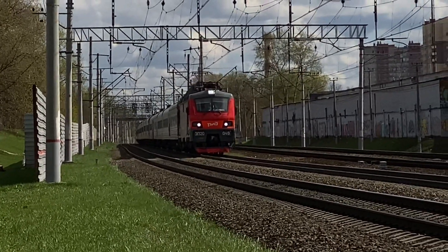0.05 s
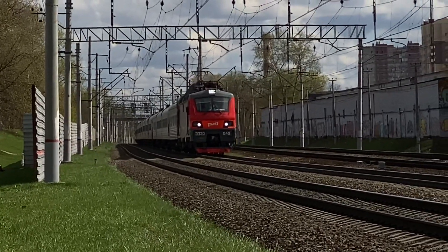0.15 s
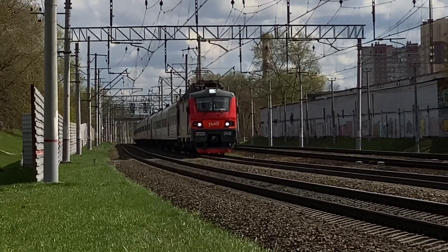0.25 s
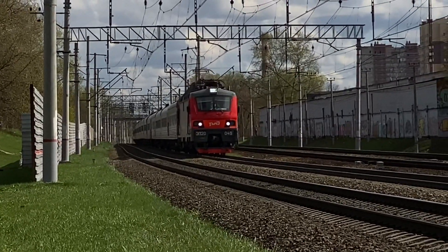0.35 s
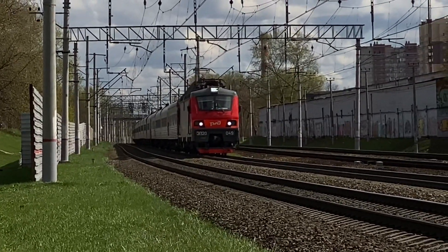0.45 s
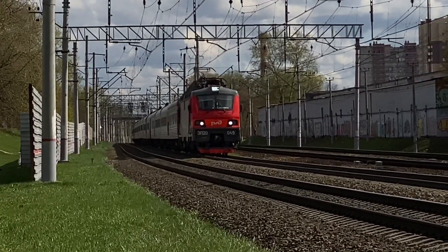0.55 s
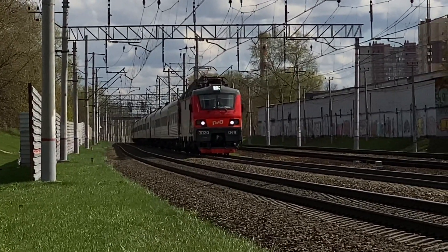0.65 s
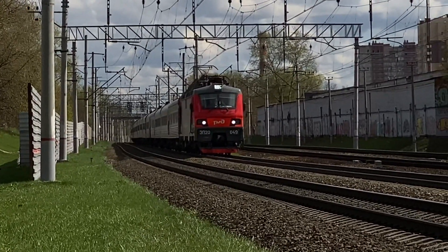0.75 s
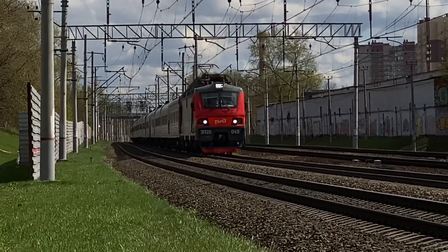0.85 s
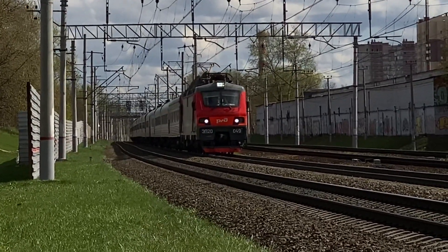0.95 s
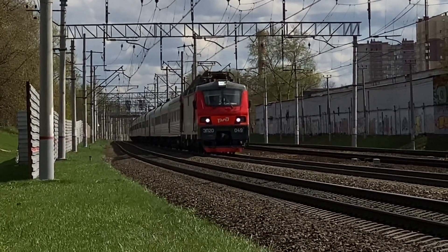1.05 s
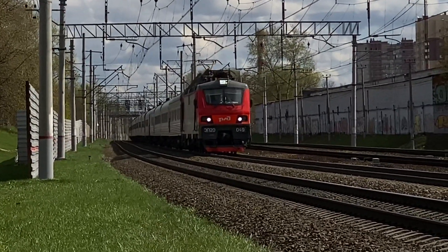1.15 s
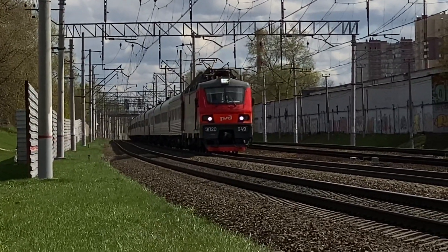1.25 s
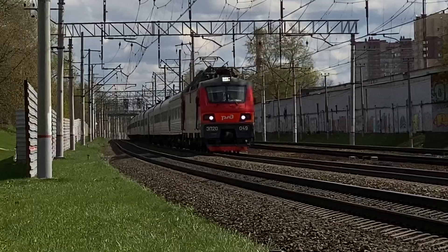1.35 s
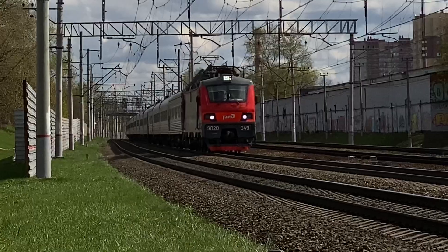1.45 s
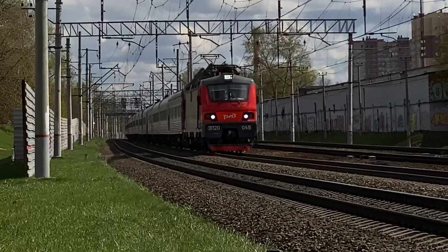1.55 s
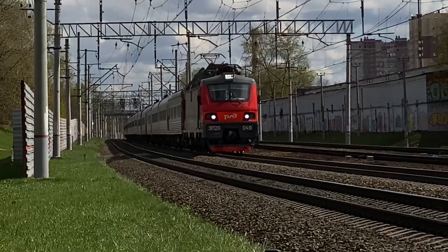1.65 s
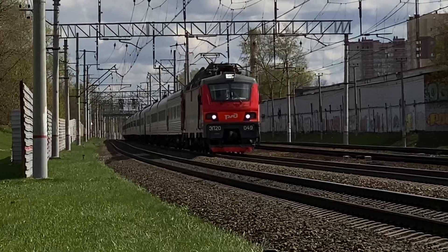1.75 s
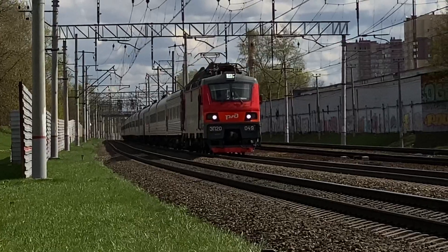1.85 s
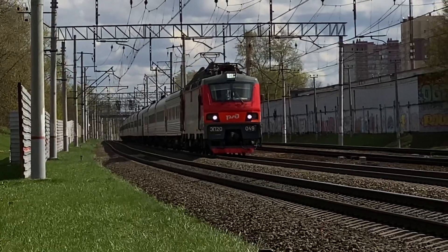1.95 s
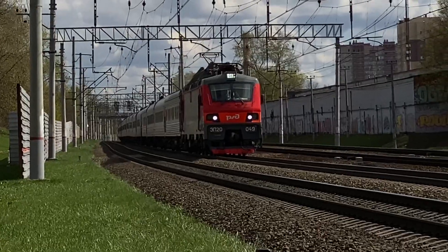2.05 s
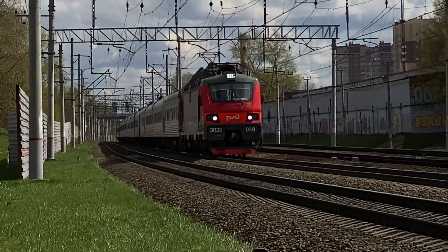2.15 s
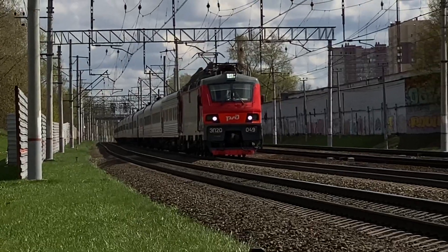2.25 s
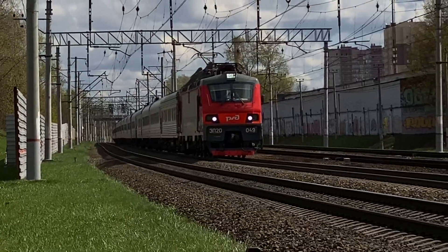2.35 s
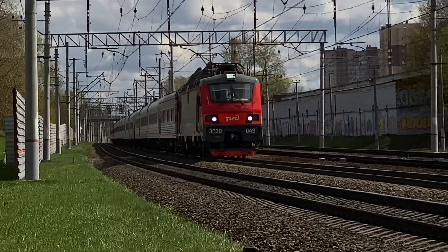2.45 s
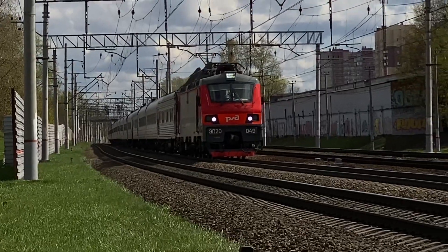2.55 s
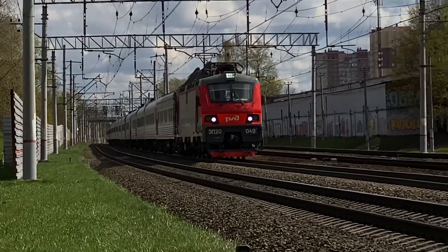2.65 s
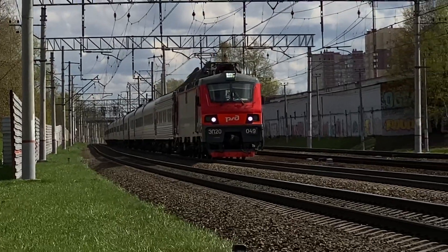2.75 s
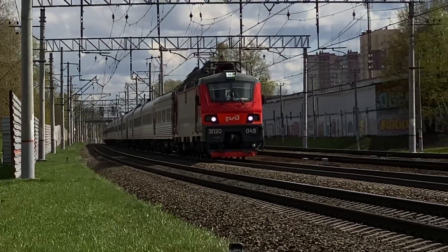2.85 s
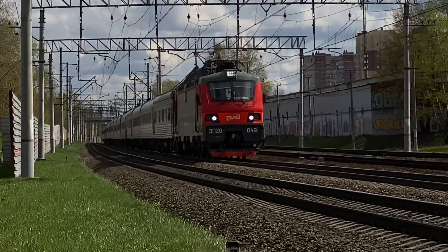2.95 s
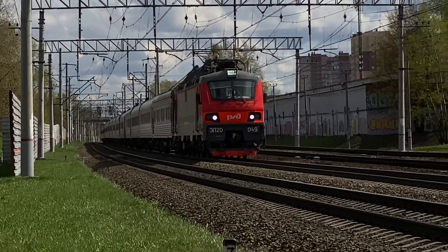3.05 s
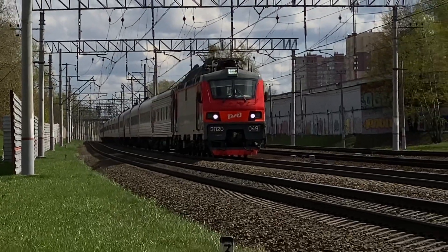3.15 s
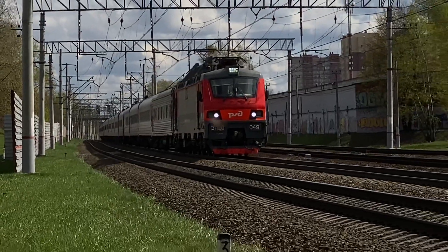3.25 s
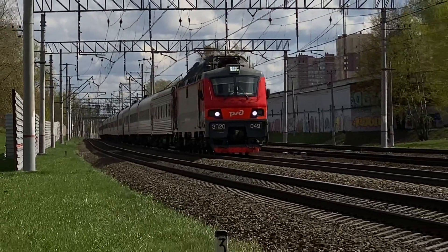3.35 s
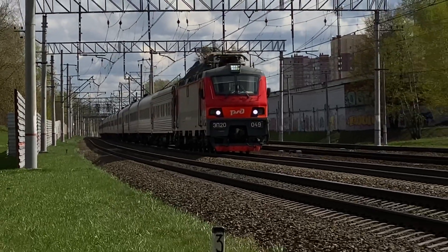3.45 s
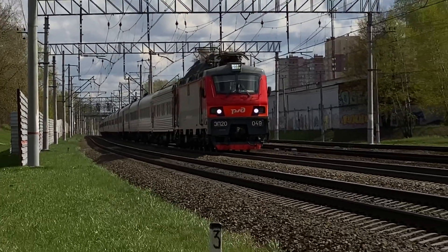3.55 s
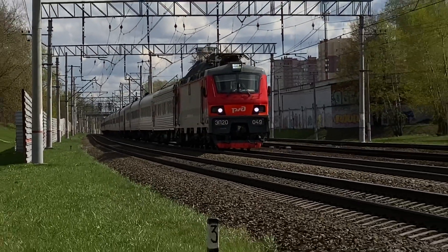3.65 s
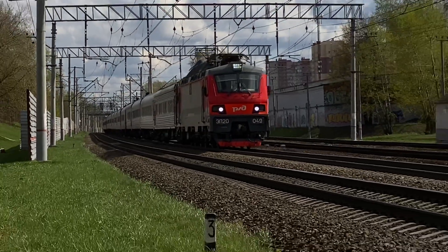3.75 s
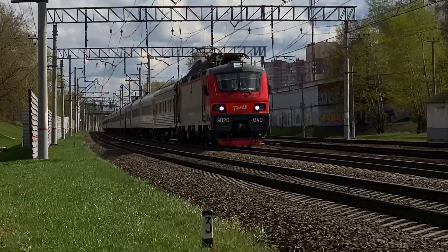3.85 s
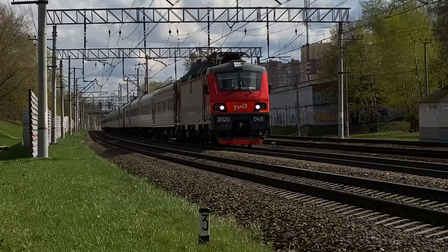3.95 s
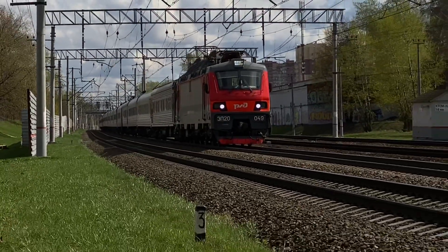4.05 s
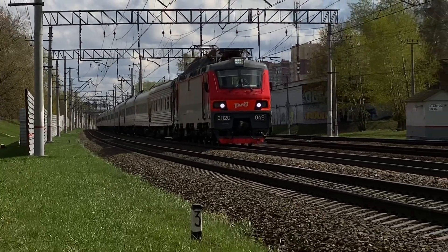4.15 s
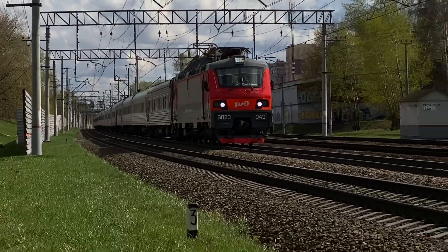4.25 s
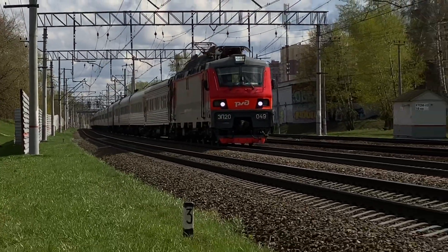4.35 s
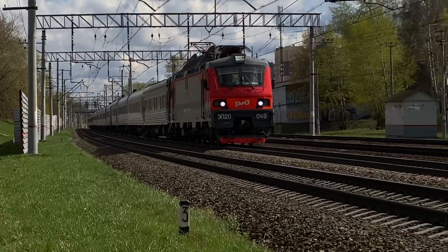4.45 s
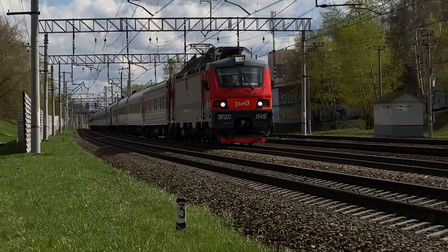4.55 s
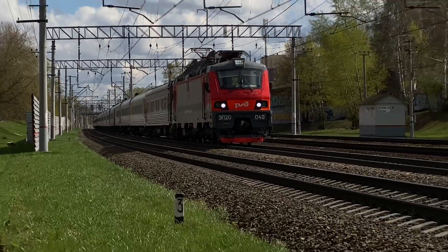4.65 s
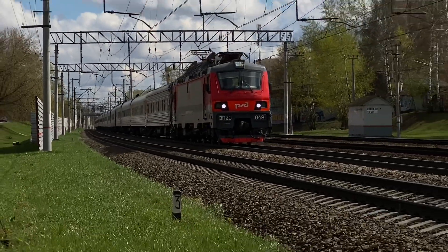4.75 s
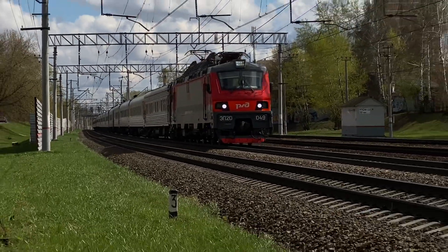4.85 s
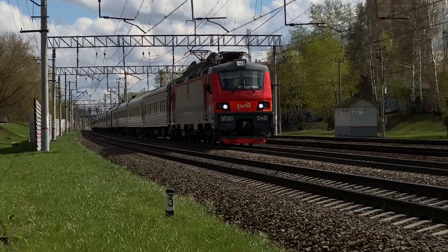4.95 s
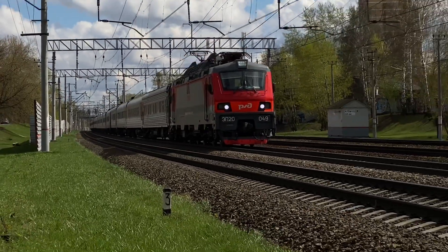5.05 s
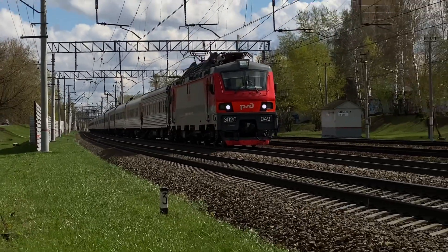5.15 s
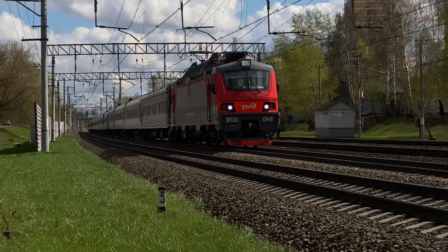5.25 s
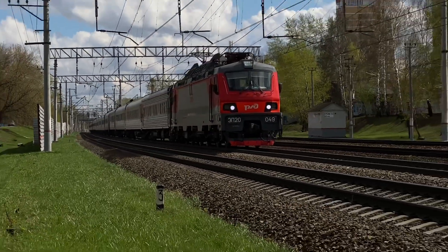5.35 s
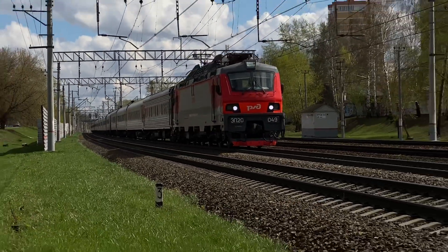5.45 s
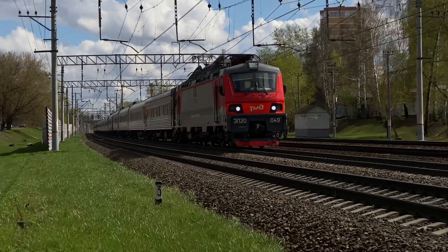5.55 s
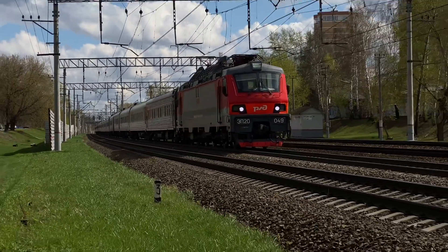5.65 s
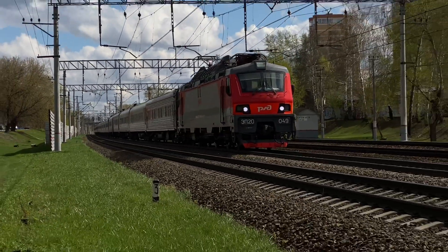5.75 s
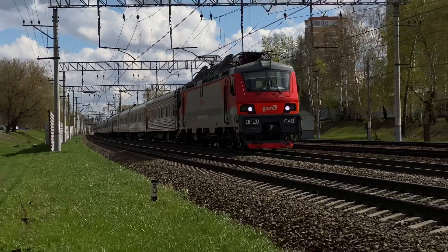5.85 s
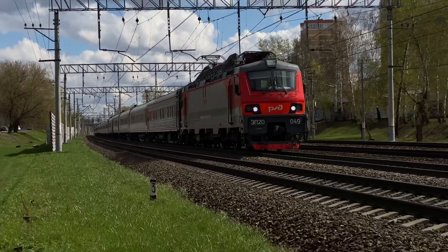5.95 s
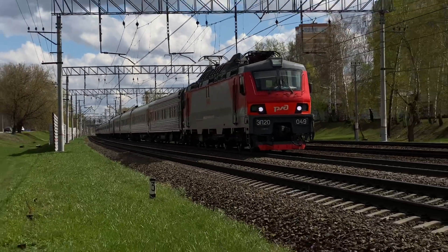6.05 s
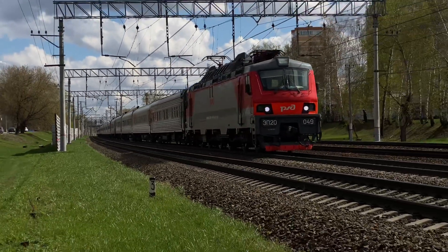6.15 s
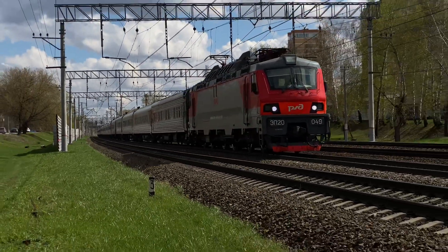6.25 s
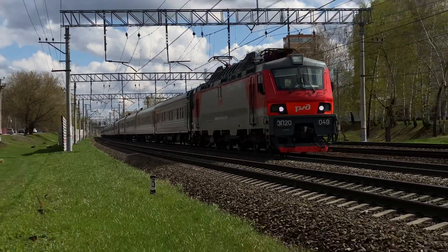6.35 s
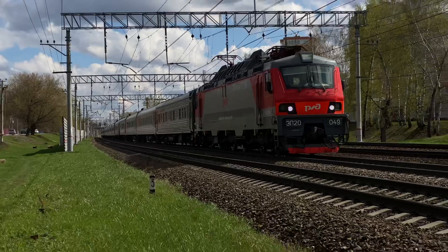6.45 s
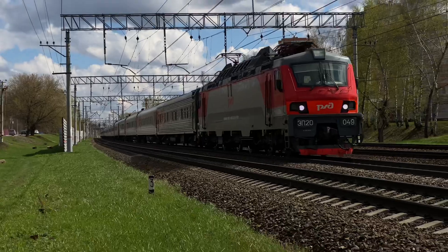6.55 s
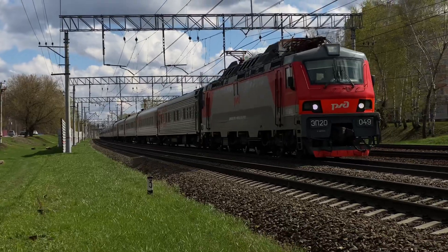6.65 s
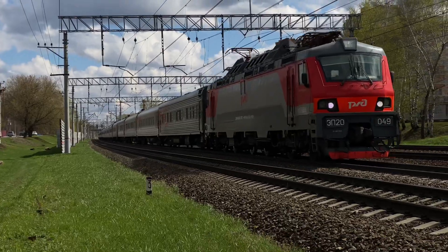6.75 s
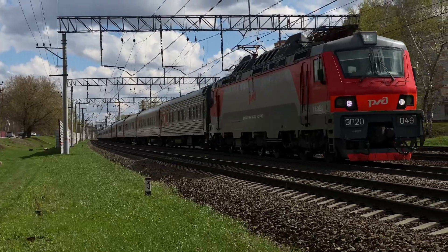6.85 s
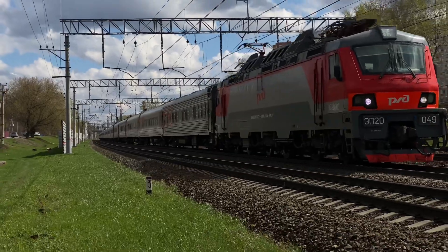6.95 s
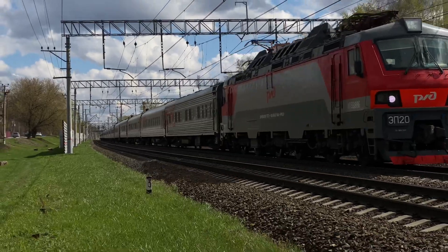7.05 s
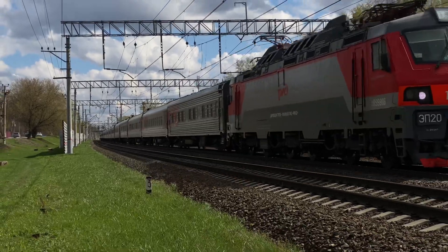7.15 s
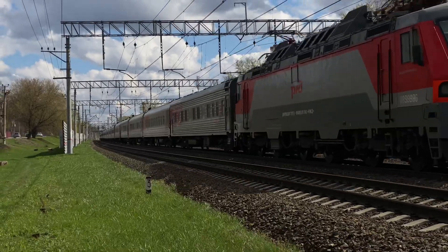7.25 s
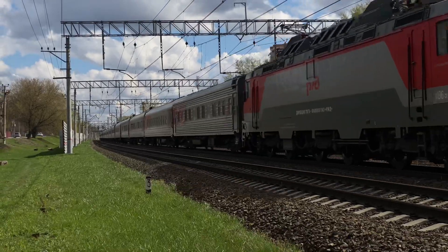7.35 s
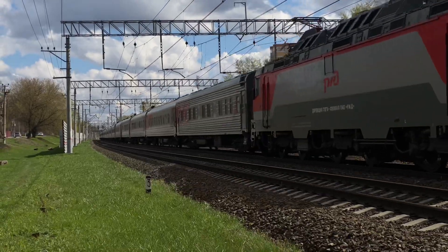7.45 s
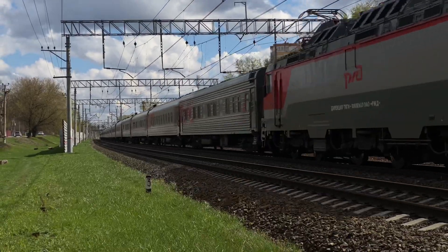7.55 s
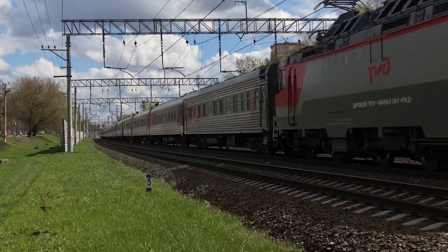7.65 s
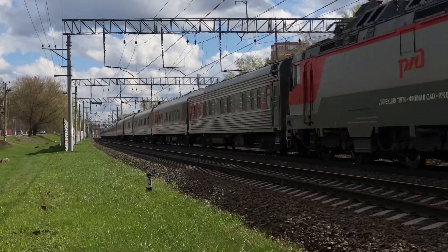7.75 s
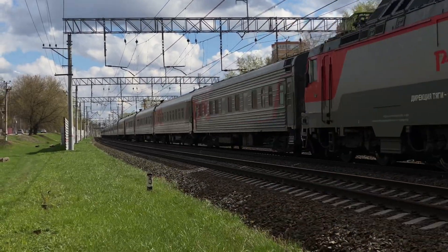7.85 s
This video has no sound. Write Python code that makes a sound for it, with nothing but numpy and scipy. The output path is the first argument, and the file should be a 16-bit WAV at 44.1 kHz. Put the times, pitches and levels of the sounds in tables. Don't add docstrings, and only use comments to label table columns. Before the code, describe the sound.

Deep rolling rumble grows slowly from near silence; a brief bright train whistle with hissing air sounds late as whining locomotive gears draw close.

```python
import sys
import numpy as np
from scipy import signal
from scipy.io import wavfile
from scipy.ndimage import uniform_filter1d

SR = 44100
rng = np.random.default_rng(int(sys.argv[2]) if len(sys.argv) > 2 else 0)


def inscribe(sig):
    pcm = np.round(np.clip(np.atleast_2d(sig).T, -1, 1) * 32767)
    wavfile.write(sys.argv[1], SR, pcm.astype(np.int16))


def magnitude_from_level(level_db):
    exponent = np.asarray(level_db, float) / 20
    return 10 ** exponent


N = 348875
WIN = 2048
HOP = WIN // 4

# time in seconds, closeness (0 far, 1 halfway, 2 near).
CLOSENESS = [(0, 0.31), (4.2, 0.079), (5.4, 1.006), (6.4, 1.207), (7.0, 1.718), (7.91, 2.08)]
STAGES = (0, 1, 1.25, 1.8, 2.16)

# time in seconds, level in dB.
RUMBLE = [(0.0, -65), (0.08, -56.5), (0.62, -48.5), (0.85, -55), (1.05, -44.5), (1.45, -42.5),
          (2.45, -40.5), (2.85, -36.5), (3.25, -38), (4.05, -34), (5.25, -31), (6.25, -28.5), (7.0, -27.5),
          (7.15, -24), (7.5, -24.5), (7.91, -25.5)]
RUMBLE_REF_DB = -40
# lowest Hz, highest Hz.
ZONES = [(80, 300), (500, 860), (1000, 1700), (4000, 8000)]
# share of the rumble's swell, town background in dB, dB at each stage.
ZONE_LEVELS = [(0.56, -70.5, -54, -55.5, -50, -46, -34), (0.26, -69, -63.5, -55, -52.5, -51.5, -39.5),
               (0.93, -99, -99, -91.5, -83.5, -76.5, -69.5)]
# Hz, then dB per Hz when far, halfway and near.
ROAR_COLOUR = [(29.8, -65.5, -59.5, -56), (85, -59, -52.5, -44.5), (320, -68.5, -64.5, -57.5),
               (494, -76, -68.5, -60), (874, -71.5, -72, -55.5), (1030, -83.5, -76.5, -64),
               (1215, -90, -75.5, -73.5), (1465, -93.5, -86.5, -72.5), (2300, -102, -96.5, -80),
               (3480, -115, -105, -91), (4520, -128, -112, -97), (7660, -142, -125, -103),
               (8260, -150, -136, -109), (16000, -160, -150, -130)]
# Hz, then dB when far, halfway and near.
ROAR_WIDTH = [(70, -19, -24, -17), (250, -18.5, -15.5, -24), (520, -9, 0, -4), (1020, -3.5, 8, -11),
              (1400, 1, -2.5, -1), (2100, -14.5, -8, -22), (3600, -22, -18.5, -26),
              (7500, -6.5, -8.5, -20.5), (8500, 0.5, -3.5, 1.5), (11500, -11.5, -13.5, -4)]

# time in seconds, level in dB.
DRUM_LEVEL = [(0, -83.5), (.15, -61), (1.2, -44.5), (1.85, -43), (2.6, -42), (3.4, -43.5), (4.12, -36.5),
              (4.5, -41.5), (5.07, -31.5), (5.18, -44), (5.44, -29), (5.62, -33.5), (5.75, -25), (6.3, -26),
              (6.37, -20), (6.65, -31.5), (7.2, -30), (7.91, -42)]
# time in seconds, pitch in Hz, unsteadiness from 0 to 1.
DRUM_NOTE = [(0, 65.77, 0.7), (3.8, 62.9, 0.5), (4.3, 62, 0.02), (5.5, 61, 0.1), (6.5, 58.7, 0.03),
             (7.0, 58.1, 0.4), (7.91, 57.25, 1)]

# time in seconds, first partial in Hz, second partial in Hz.
GEAR_HZ = [(0, 450, 903.7), (2.5, 452, 919), (4.5, 455, 921), (5.6, 461, 934.3), (6.4, 467, 938.4),
           (7.91, 464.9, 935)]
# time in seconds, level in dB.
GEAR_FIRST = [(0, -77), (.6, -68), (1.35, -55), (2.3, -53), (4.0, -51.5), (5.5, -51), (6.2, -49.5),
              (6.9, -44.5), (7.116, -33), (7.22, -50), (7.364, -30.5), (7.434, -38.5), (7.492, -28),
              (7.606, -25.5), (7.79, -39.5), (7.856, -25.5), (7.91, -22)]
# share of the rumble's swell, dB at each stage.
GEAR_UPPER = [(0.35, -57.5, -57.5, -51.5, -50.5, -38.5), (0.072, -78, -74, -64, -57.5, -46.5)]
# multiple of the first, dB over the fourth.
GEAR_OVERTONES = [(3, -8.5), (5, -1.5), (3.22, -8.5)]
# time in seconds, length in seconds, gain in dB.
FLARES = [(.15, 0.037, 9.5), (0.708, .07, 12), (1.17, .05, 9), (1.313, .04, 7), (1.76, .05, 7),
          (2.06, 0.057, 8.5), (2.33, .06, 5), (2.933, 0.095, 7), (3.34, .04, 5), (4.816, 0.044, 4.5),
          (5.71, 0.067, 4), (5.986, 0.044, 7), (6.45, .06, 6.5), (7.08, 0.073, 12), (7.588, .05, 8.5),
          (7.77, 0.11, 7)]
# Hz, width in Hz, level in dB.
BODY_RINGS = [(221, 24, -36.5), (598.5, 28, -42), (866, 40, -42.5)]
# Hz, width in Hz, level in dB, time in seconds, length in seconds.
RAIL_RINGS = [(334.9, 22, -50, 4.43, 1.22), (212, 40, -44, 5.6, 1.6)]

# time in seconds, pitch in Hz, first partial in dB, air hiss in dB.
BLAST = [(6.479, 741, -41, -46), (6.498, 753, -18.5, -37), (6.522, 723, -16, -38.5),
         (6.59, 701.3, -19.5, -37.5), (6.7, 705, -18, -37), (6.795, 699, -20, -40),
         (6.812, 680, -28, -42.5), (6.84, 670.4, -35, -46.5), (6.94, 650, -49.5, -64.5)]
# dB over the hiss, growth in dB per second while held, change in dB once spent.
PIPE_PARTIALS = [(-0.5, 1, -18), (6.5, 5, -3), (-2.5, 21, -4), (-6.5, -11, 8.5)]
# multiple of the first, dB over the hiss.
PIPE_HIGH = [(6, -5.5), (7, -9.5), (8, -15), (9, -16), (10, -20)]
CHIFF_DB, CHIFF_S = 8, 0.0097
HELD_FROM_S, SPEAKS_TILL_S = 6.55, 6.835
SILENT_S, FADE_S = 6.93, 0.035
# Hz, dB per Hz.
AIR_COLOUR = [(500, -76), (1000, -75.5), (1750, -76), (3150, -77), (4600, -72.5), (6000, -77), (8000, -76),
              (9500, -84.5), (11500, -82), (16000, -93)]
# Hz, side over mid in dB.
AIR_WIDTH = [(500, -6), (1000, 1), (1750, -34), (2500, -24), (3200, -11), (4600, -15), (8000, -5),
             (9500, -4), (11500, -8), (16000, 9)]
DULL_DB, DULL_S, DULL_HZ = -30, 0.067, (11000, 14500)
# delay in seconds, level in dB, left minus right in dB.
ECHOES = [(.075, -20, 2)]
TAIL_DB, TAIL_SIDE_DB, TAIL_T60_S = -16.5, -13.5, 1.7

# start in seconds, start Hz, end Hz, glide in seconds, decay in seconds, level in dB.
JOINT = (6.5455, 265, 66, .008, .022, -11)

# start in seconds, length in seconds,
# Hz, width in Hz, level in dB.
BURSTS = [(0., .045, 6900, 2400, -75), (0., .045, 4350, 600, -81), (0., .045, 3500, 600, -82),
          (1.519, .008, 9500, 5000, -88), (1.64, .09, 7200, 4500, -88)]
# Hz, dB per Hz.
CIRCUIT_HISS = [(3000, -140), (4500, -134), (7900, -134), (8200, -138), (11700, -139), (11900, -132),
                (12300, -132), (12500, -146), (16000, -146)]
# Hz, in step, a quarter turn ahead.
PORTS = [(25, -.03, 0.23), (250, 0.033, 0.095), (520, 0.058, 0.13), (705, -.1, 0.31), (900, -0.018, 0.38),
         (1250, -.35, -.4), (1500, 0., -.3), (2100, -.09, 0.24), (3600, .01, .29), (7000, 0., .12),
         (8500, 0., .75), (11500, 0., 0.)]
# time in seconds, mono below this Hz.
WIND_GUARD = [(0, 440), (1.1, 340), (1.6, 190), (2.25, 87), (2.35, 0.91)]
LOW_HZ, GAP_HZ, TOP_HZ = 38, (12500, 14200), 15800


def curve(table, t=None):
    s, *columns = np.transpose(table)
    t = np.arange(N) / SR if t is None else t
    return [np.interp(t, s, c) for c in columns]


def shape(table, hz, column=1):
    table = np.transpose(table)
    return np.interp(np.log(np.maximum(hz, 1)), np.log(table[0]), table[column])


def frames():
    return np.fft.rfftfreq(WIN, 1 / SR), np.arange(-(-N // HOP) + 1) * HOP / SR


def hats(place, count):
    place = np.clip(place, 0, count - 1)
    return np.maximum(0, 1 - np.abs(place[:, None] - np.arange(count)))


def unit(x):
    return x / np.sqrt(np.mean(np.abs(x) ** 2))


def wobble(width_hz):
    steps = np.arange(N) / SR * width_hz * 8
    chance = rng.standard_normal((2, int(steps[-1]) + 2))
    slow = uniform_filter1d(uniform_filter1d(chance, size=3), size=3)
    return unit(np.interp(steps, np.arange(slow.shape[1]), slow[0] + 1j * slow[1]))


def tone(hz, rough, width_hz):
    rough = np.clip(rough, 0, 1)
    carrier = np.exp(2j * np.pi * np.cumsum(hz) / SR)
    fading = np.sqrt(1 - rough) + np.sqrt(rough) * wobble(width_hz)
    return np.sqrt(2) * np.real(carrier * fading)


def coloured(db_per_hz):
    _, _, z = signal.stft(rng.standard_normal(N), SR, nperseg=WIN, noverlap=WIN - HOP)
    z = z * magnitude_from_level(db_per_hz) * np.sqrt(SR / 2)
    return signal.istft(z, SR, nperseg=WIN, noverlap=WIN - HOP)[1][:N]


def stereo(mid, side):
    return np.array([mid + side, mid - side])


def staged(levels, t=None):
    return np.interp(curve(CLOSENESS, t)[0], STAGES, levels)


def swell(t=None):
    moments = frames()[1]
    slow_db = uniform_filter1d(curve(RUMBLE, moments)[0], size=43, mode="nearest")
    return curve(np.transpose([moments, slow_db]), t)[0] - RUMBLE_REF_DB


def roar():
    hz, t = frames()
    stage = hats(curve(CLOSENESS, t)[0], count=3).T
    colour = np.transpose([shape(ROAR_COLOUR, hz, column=k) for k in (1, 2, 3)]) @ stage
    width_db = np.transpose([shape(ROAR_WIDTH, hz, column=k) for k in (1, 2, 3)]) @ stage
    have = []
    for low, high in ZONES:
        power = magnitude_from_level(colour[(hz > low) & (hz < high)]) ** 2
        have.append(10 * np.log10(power.sum(axis=0) * hz[1]))
    wanted = [curve(RUMBLE, t)[0]]
    for share, town_db, *levels in ZONE_LEVELS:
        train_db = share * swell(t) + staged(levels, t)
        wanted.append(20 * np.log10(np.hypot(magnitude_from_level(train_db), magnitude_from_level(town_db))))
    samples = np.minimum(t * SR, N - 1).astype(int)
    gusts = np.real([wobble(3.)[samples] for _ in ZONES])
    lift = np.array(wanted) - have + 1.1 * gusts
    place = shape([(np.sqrt(low * high), k) for k, (low, high) in enumerate(ZONES)], hz)
    colour = colour + hats(place, count=4) @ lift
    return stereo(coloured(colour), coloured(colour + width_db))


def drum():
    hz, rough = curve(DRUM_NOTE)
    return magnitude_from_level(curve(DRUM_LEVEL)[0]) * tone(hz, rough, 5.)


def gears():
    (hz, second_hz), close = curve(GEAR_HZ), curve(CLOSENESS)[0]
    first = curve(GEAR_FIRST)[0] + close
    second, fourth = [share * swell() + staged(levels) + close for share, *levels in GEAR_UPPER]
    moments = frames()[1]
    flare = sum(db * np.exp(-((moments - at) / length) ** 2) for at, length, db in FLARES)
    second = second + curve(np.transpose([moments, flare]))[0]
    out = magnitude_from_level(first - 3.0) * tone(hz, .45 - 0.11 * close, 9.)
    out = out + magnitude_from_level(second - 3.5) * tone(second_hz, .72 - 0.28 * close, 16.)
    out = out + magnitude_from_level(fourth - 2.0) * tone(2 * second_hz, 0.51, 12.)
    near_db = 14 * (close - 2) + curve([(7.0, -4), (7.5, 0.5), (7.91, 7.5)])[0]
    for multiple, db in GEAR_OVERTONES:
        out = out + magnitude_from_level(fourth - 9 + db + near_db) * tone(multiple * hz, 0.23, 9.)
    for ring_hz, width_hz, db in BODY_RINGS:
        out = out + magnitude_from_level(db + near_db) * tone(np.full(N, ring_hz), 0.69, width_hz / 2)
    for ring_hz, width_hz, db, at, length in RAIL_RINGS:
        rise_and_fall = np.exp(-((np.arange(N) / SR - at) / length) ** 2)
        out = out + magnitude_from_level(db) * rise_and_fall * tone(np.full(N, ring_hz), .9, width_hz / 2)
    return stereo(out, magnitude_from_level(-11.0) * np.roll(out, 40))


def whistle():
    hz, first, air_db = curve(BLAST)
    t = np.arange(N) / SR
    opens, closes = BLAST[0][0], BLAST[-1][0]
    chiff = CHIFF_DB * np.exp(-np.maximum(t - opens - .006, 0) / CHIFF_S)
    held = np.clip(t - HELD_FROM_S, -.1, .16)
    spent = np.clip((t - SPEAKS_TILL_S) / 0.012, 0, 1)
    partials = [first]
    for (db, growth, loss_db), bite in zip(PIPE_PARTIALS, (-.8, 0.96, -.4, 0.6)):
        partials.append(air_db + db + growth * held + loss_db * spent + chiff * bite)
    pipe = 0
    for k, db in enumerate(partials):
        rough = .006 + 0.034 * k + .8 * spent * (k == 0)
        pipe = pipe + magnitude_from_level(db) * tone((k + 1) * hz, rough, 30.)
        pipe = pipe + magnitude_from_level(db - 17.5 + 4.74 * k) * tone((k + 1) * hz, 0.96, 90.)
    for multiple, db in PIPE_HIGH:
        pipe = pipe + magnitude_from_level(air_db + db) * tone(multiple * hz, 0.26, 40.)
    pipe = pipe + magnitude_from_level(partials[0] - 17.5) * tone(1.1 * hz, 0.33, 20.)
    valve = np.clip((t - opens) / 0.0097, 0, 1) * np.clip((closes + 0.12 - t) / 0.1, 0, 1)
    blown = valve * np.clip((SILENT_S - t) / FADE_S, 0, 1) * pipe
    return blown + valve * magnitude_from_level(air_db) * spent_air() + echoes(blown)


def spent_air():
    hz, moments = frames()
    air = shape(AIR_COLOUR, hz)
    treble = magnitude_from_level(air[(hz > 5000) & (hz < 12000)]) ** 2
    air = air - 10 * np.log10(treble.sum() * hz[1])
    dulling = np.clip((moments - SPEAKS_TILL_S) / DULL_S, 0, 1)
    air = air[:, None] + DULL_DB * np.outer(np.interp(hz, DULL_HZ, (0, 1)), dulling)
    return stereo(coloured(air), coloured(air + shape(AIR_WIDTH, hz)[:, None]))


def echoes(blown):
    out = np.zeros((2, N))
    for delay, db, pan_db in ECHOES:
        sides = magnitude_from_level(db + np.array([pan_db, -pan_db]) / 2)
        out = out + np.outer(sides, np.roll(blown, int(delay * SR)))
    t = np.arange(SR) / SR
    fall = np.exp(-np.log(1000) * t / TAIL_T60_S) * np.minimum(t / 0.033, 1)
    tail = rng.standard_normal((2, SR)) * fall / np.sqrt(np.sum(fall ** 2))
    dull = signal.sosfilt(signal.butter(2, 1100, fs=SR, output="sos"), blown)
    levels = magnitude_from_level(np.array([[TAIL_DB], [TAIL_SIDE_DB]]))
    return out + stereo(*levels * signal.fftconvolve(dull[None], tail)[:, :N])


def knock():
    start, from_hz, to_hz, glide, decay, db = JOINT
    t = np.maximum(np.arange(N) / SR - start, 0)
    turns = to_hz * t + (from_hz - to_hz) * glide * (1 - np.exp(-t / glide))
    return -magnitude_from_level(db) * np.sin(2 * np.pi * turns) * np.exp(-t / decay) * np.minimum(t / 0.0044, 1)


def rustle():
    t = np.arange(N) / SR
    hiss_db = shape(CIRCUIT_HISS, frames()[0])[:, None]
    out = stereo(coloured(hiss_db), coloured(hiss_db - 6.0))
    for start, length, hz, width_hz, db in BURSTS:
        stroke = np.sin(np.pi * np.clip((t - start) / length, 0, 1) ** 0.58)
        out = out + magnitude_from_level(db) * tone(np.full(N, hz), 1, width_hz / 2) * stroke
    return out


def scene():
    return roar() + drum() + gears() + whistle() + knock() + rustle()


def top_cut(x):
    return signal.sosfilt(signal.butter(12, 16990, fs=SR, output="sos"), x)


def record(dry):
    wide = np.pad(dry, ((0, 0), (WIN, WIN)), mode="reflect", reflect_type="odd")
    wide = signal.sosfilt(signal.butter(3, LOW_HZ, "high", fs=SR, output="sos"), wide)
    hz, t, (left, right) = signal.stft(wide, SR, nperseg=WIN, noverlap=WIN - HOP)
    mid = (left + right) / 2
    ports = shape(PORTS, hz) + 1j * shape(PORTS, hz, column=2)
    side = (left - right) / 2 + mid * ports[:, None]
    side = side * (hz[:, None] > curve(WIND_GUARD, t - WIN / SR)[0])
    kept = ((hz < GAP_HZ[0]) | (hz > GAP_HZ[1])) & (hz < TOP_HZ)
    mix = signal.istft(stereo(mid, side) * kept[:, None], SR, nperseg=WIN, noverlap=WIN - HOP)[1]
    mix = mix[:, WIN:WIN + N]
    mix = mix * np.clip((N - np.arange(N)) / 60 + .7, 0, 1)
    return top_cut(mix)


dry = scene()
out = record(dry)
inscribe(out)
```